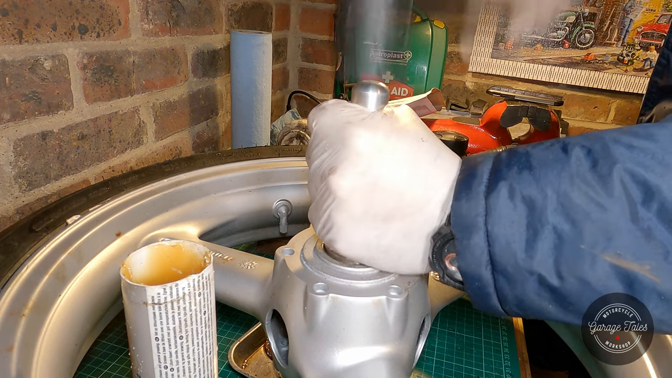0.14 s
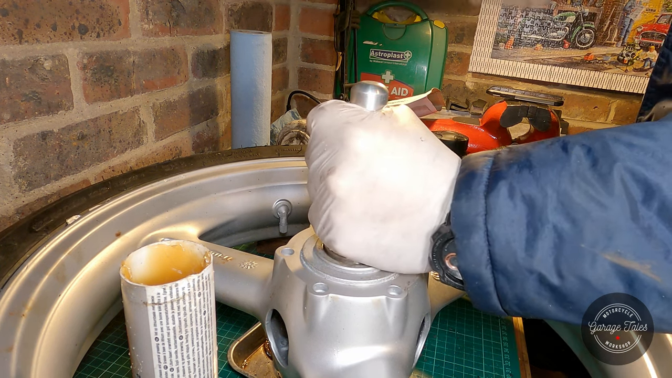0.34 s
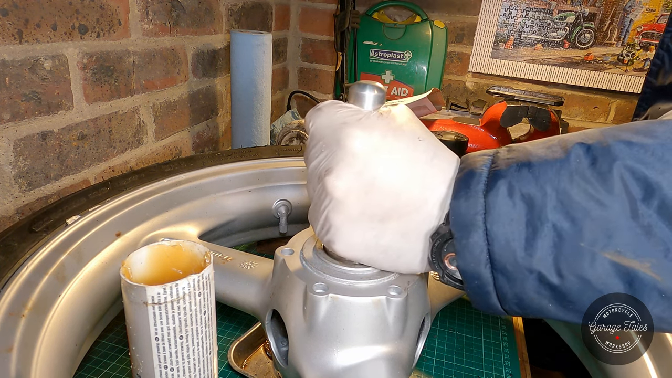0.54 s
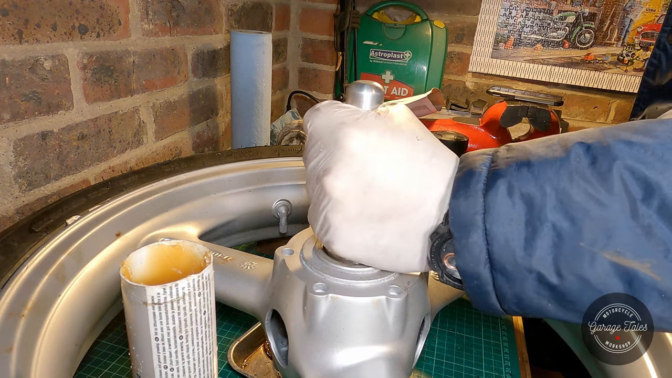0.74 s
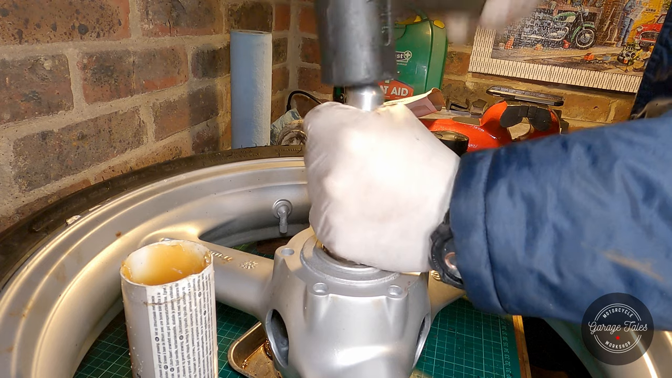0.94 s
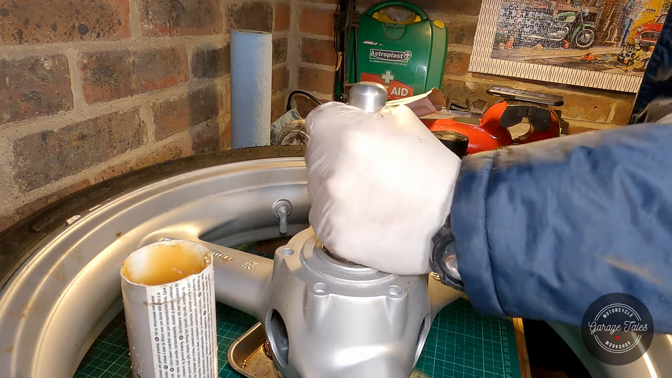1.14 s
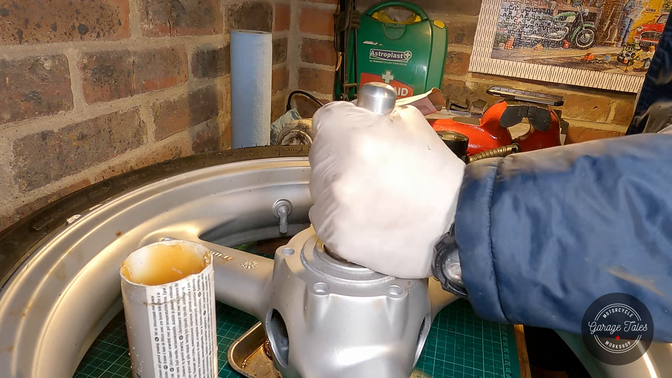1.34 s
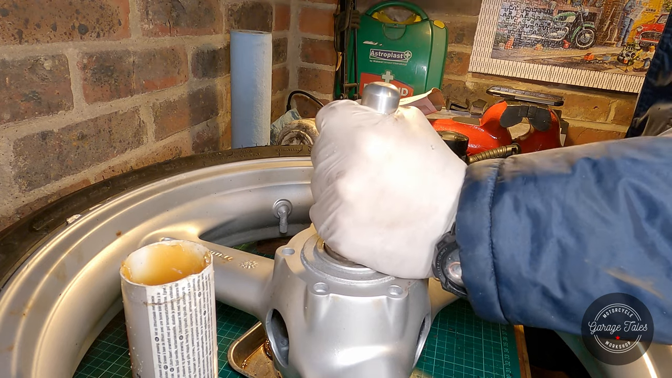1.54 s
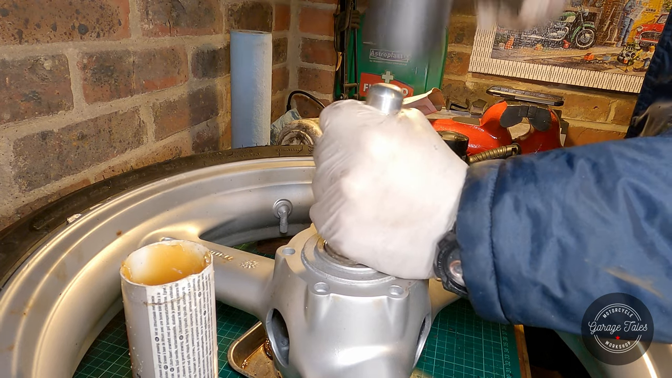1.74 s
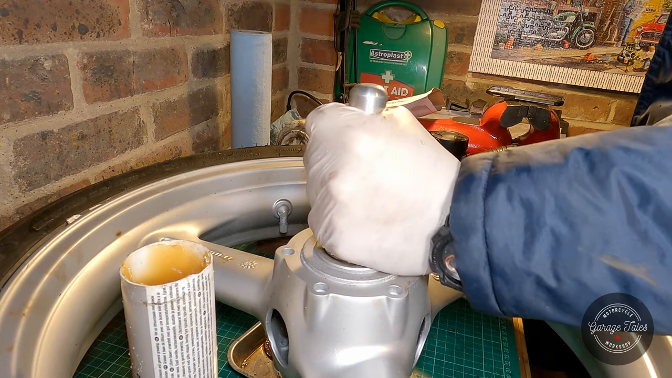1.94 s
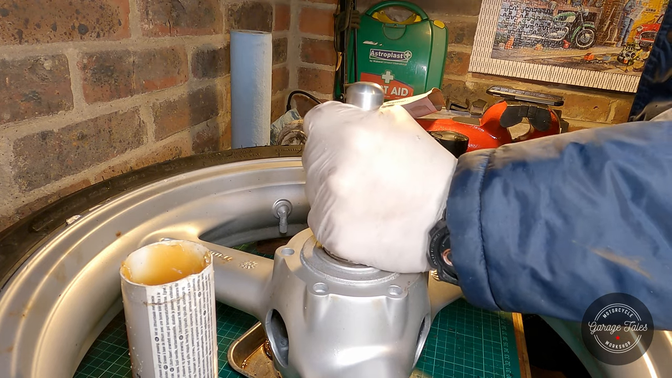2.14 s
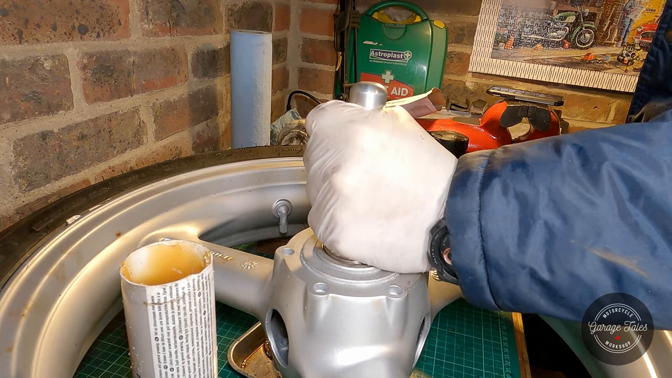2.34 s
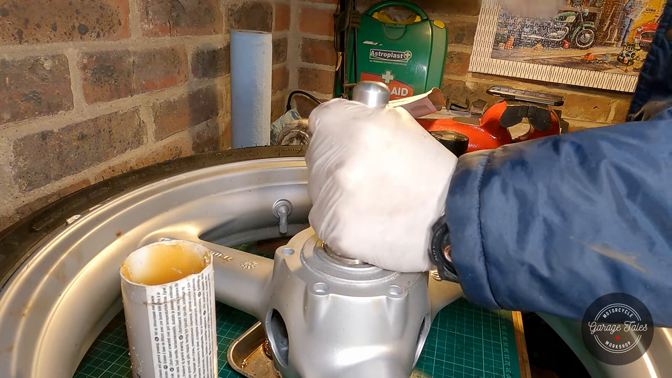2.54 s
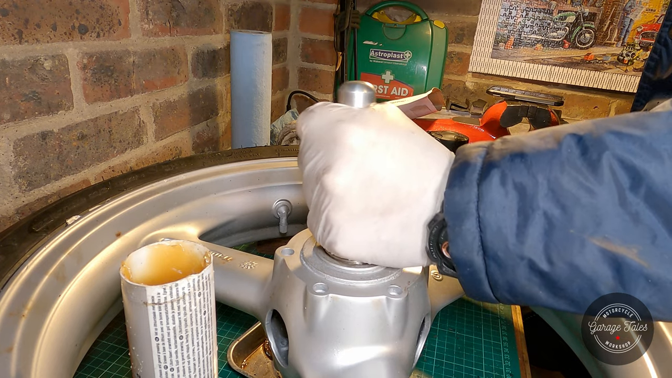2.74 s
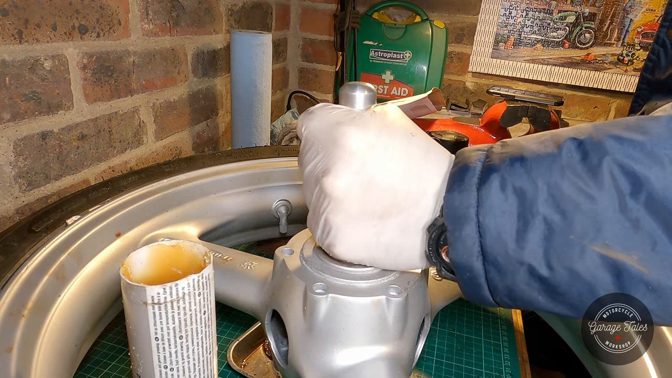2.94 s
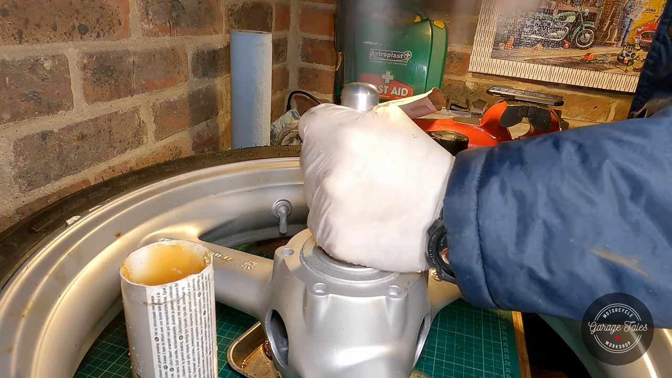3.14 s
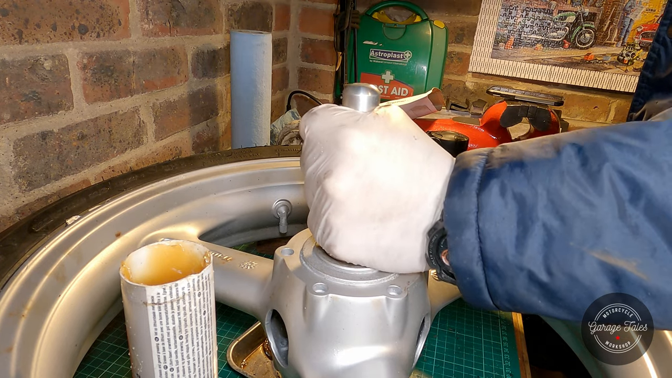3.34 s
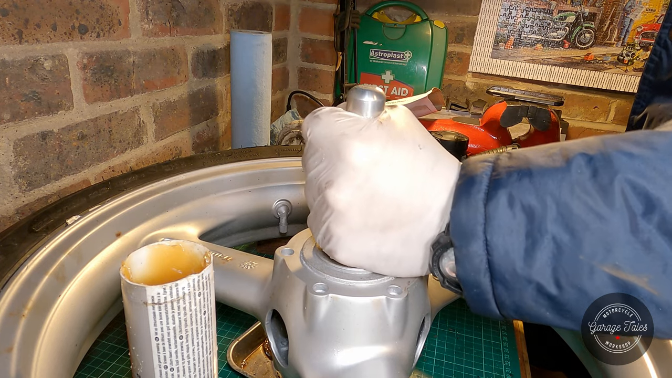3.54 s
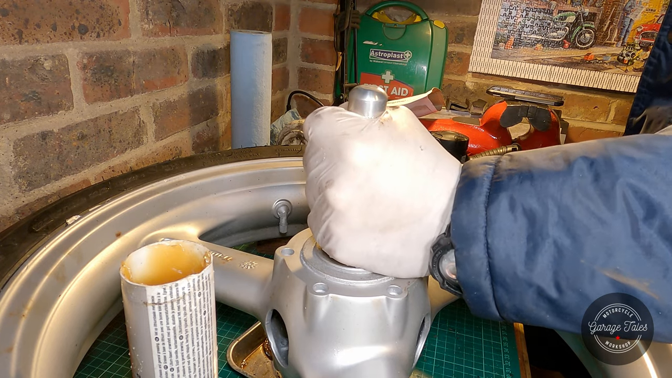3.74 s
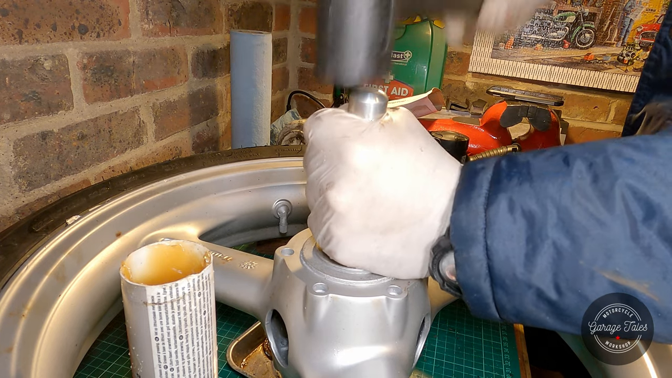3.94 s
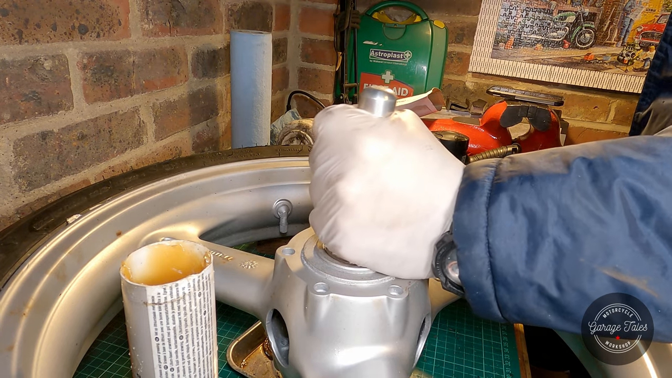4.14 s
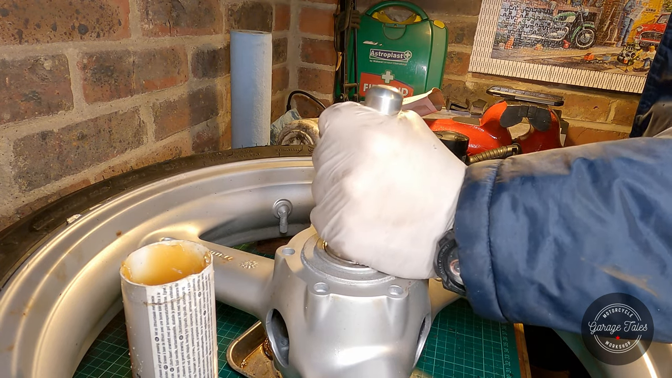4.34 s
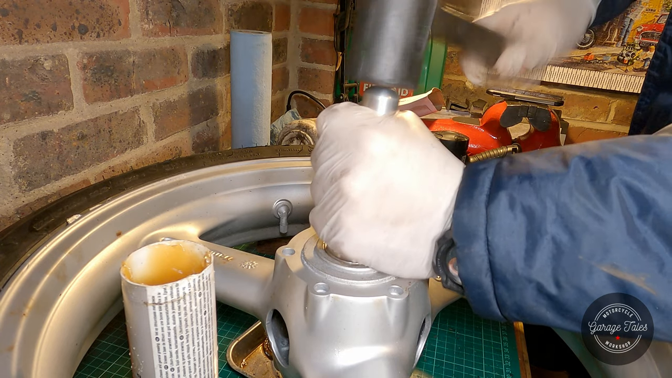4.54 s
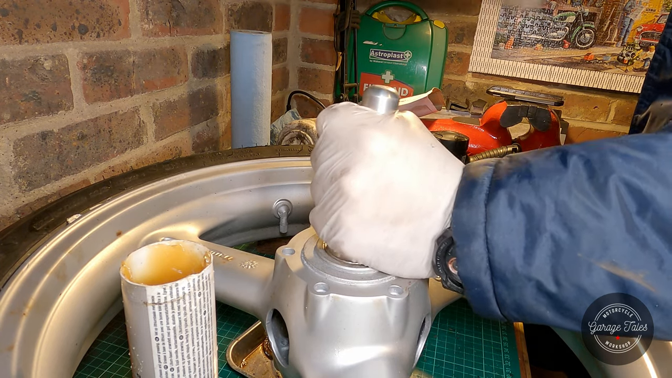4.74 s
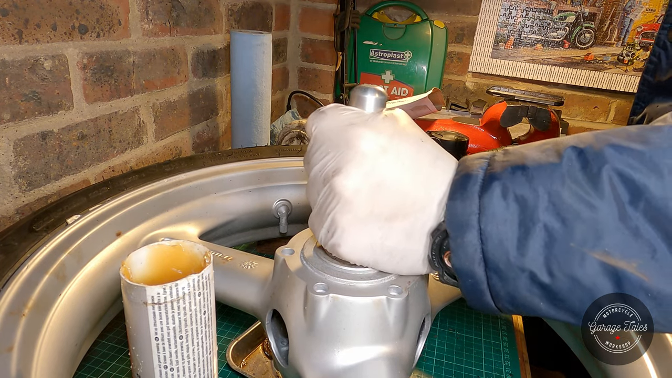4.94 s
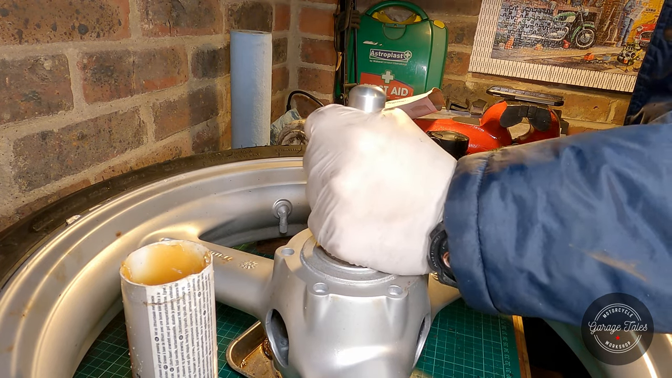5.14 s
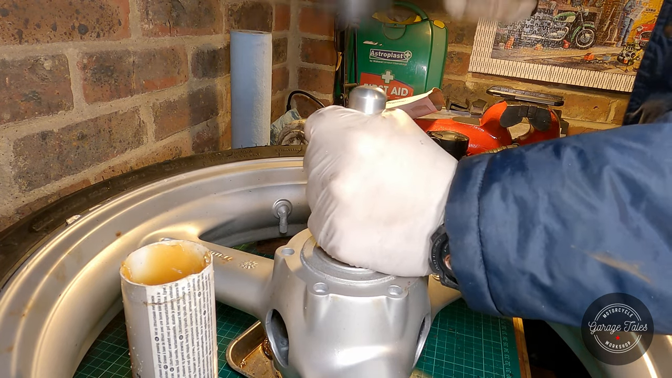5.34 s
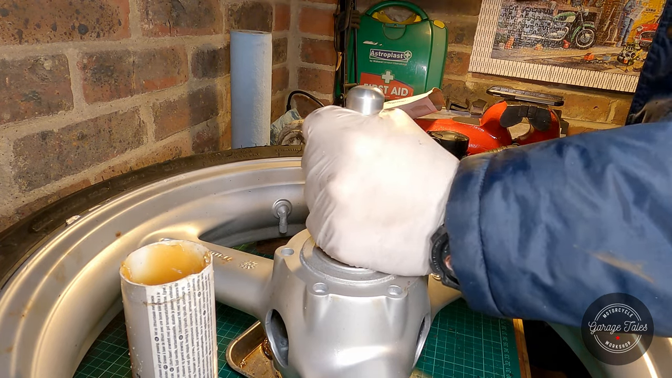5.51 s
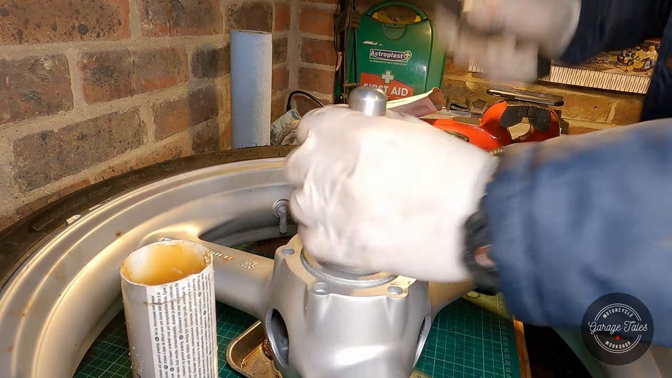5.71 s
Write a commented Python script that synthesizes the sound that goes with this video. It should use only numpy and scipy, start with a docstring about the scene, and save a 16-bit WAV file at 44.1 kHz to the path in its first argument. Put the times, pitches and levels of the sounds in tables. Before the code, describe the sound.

A steady series of eight mallet blows on metal, recorded close and nearly centred, the peaks slightly squashed and clipped. Each is a dry crack with a brief metallic clank, hollow middle knock and low thud fading into a short room tail. The clack brightens as the bearing seats. Sleeve rustle fills the gaps over very quiet room noise and faint hum; a weaker final hit is followed by rustle and small ringing ticks.

```python
"""In a small brick garage, a mallet drives a bearing into a wheel hub on a workbench: eight blows on a steel driver.
Each blow is a noise crack, short dying tones of hub, bearing, driver and wheel, a low bench thump and an echo.
The bearing's clack grows as it seats. Shaped noise makes the jacket sleeve's rustle and the driver's scrape and ticks.
Behind them lie room noise and a faint hum. At the end the loudest peaks are ducked a little late and clipped."""
import sys
import numpy as np
from scipy import signal
from scipy.fft import rfft, irfft, next_fast_len
from scipy.io import wavfile
from scipy.ndimage import map_coordinates

SR = 44100
rng = np.random.default_rng(int(sys.argv[2]) if len(sys.argv) > 2 else 0)


def unload_wav(signal):
    """Save mono or channel-first audio to the path in sys.argv[1] as 16-bit WAV at rate SR, clipped to [-1, 1]."""
    wavfile.write(
        sys.argv[1],
        SR,
        np.round(np.clip(np.atleast_2d(signal).T, -1, 1) * 32767).astype(np.int16),
    )


N = 258901  # length in samples


def amp(db):
    """Turn decibels into a gain."""
    return 10 ** (np.asarray(db) / 20)


def unit(x):
    """Scale x to an rms of 1."""
    return x / np.sqrt(np.mean(x ** 2) + 1e-20)


def along(points, hz):
    """Read a curve of (frequency, value) points on a log frequency axis."""
    f, v = np.transpose(points)
    return np.interp(np.log(hz + 1), np.log(f), v)


def filtered(x, response):
    """Multiply the spectrum of x by a response that depends on frequency."""
    n = x.shape[-1]
    padded = next_fast_len(n + SR // 4)
    spectrum = rfft(x, padded) * response(np.fft.rfftfreq(padded, 1 / SR))
    return irfft(spectrum, padded)[..., :n]


def noise(spectrum, n):
    """Make n samples of coloured noise at an rms of 1."""
    return unit(filtered(rng.standard_normal(n), lambda hz: amp(along(spectrum, hz))))


def wobble(rate):
    """Draw a smooth random curve through `rate` random points a second."""
    knots = rng.standard_normal(int(N * rate / SR) + 4)
    return map_coordinates(knots, [np.arange(N) * rate / SR])


def fade(t, t60):
    """Die away freely, falling 60 dB in t60 seconds."""
    return np.exp(-np.log(1000) * t / t60)


def swell(start_s, attack_s, hold_s, release_s):
    """Rise 60 dB up to start_s, hold, then fall 60 dB."""
    t = np.arange(N) / SR - start_s
    return fade(np.maximum(-t, 0), attack_s) * fade(np.maximum(t - hold_s, 0), release_s)


def add(track, s, sound):
    """Mix a sound into the track at time s."""
    start = max(round(s * SR), 0)
    track[start:start + len(sound)] += sound[:N - start]


def ring(modes, t):
    """Struck solid parts sound as a sum of dying sine tones, here with alternating signs."""
    out = 0
    for k, (hz, db, t60) in enumerate(modes):
        out = out + (-1) ** k * amp(db) * fade(t, t60) * np.sin(2 * np.pi * hz * t)
    return out


# colour of the room noise: (frequency [Hz], relative level [dB])
ROOM_SPECTRUM = [(25, -11), (55, -9.5), (80, -1), (110, -6), (160, 2.5), (300, -4), (550, -6), (1000, -9),
                 (3000, -15), (7000, -29.5), (9500, -41), (12000, -23), (14500, -58)]
# faint hum of the garage: (frequency [Hz], average level [dB])
HUM_TONES = [(155, -71), (203, -76)]


def background():
    """Quiet room noise, with faint hum tones that waver in level and phase."""
    t = np.arange(N) / SR
    hum = 0
    for hz, db in HUM_TONES:
        level = amp(db + 2 * wobble(5.5)) * np.sqrt(2)
        hum = hum + level * np.sin(2 * np.pi * hz * t + .8 * wobble(4.9))
    return hum + amp(-67) * noise(ROOM_SPECTRUM, N)


# colour of rubbing jacket cloth: (frequency [Hz], relative level [dB])
CLOTH_SPECTRUM = [(150, -26.5), (600, -3.5), (1700, 3.5), (3500, 2), (7000, -3.5), (9500, -23),
                  (12000, -3.5), (13500, -24.5), (15500, -55)]
# the arm lifts before a blow: (time ahead of the blow [s], attack [s], hold [s], release [s])
ARM_LIFT = (.5, .4, .08, 0.57)
# the arm swings down: (time ahead of the blow [s], attack [s], hold [s], release [s])
ARM_SWING = (0.072, 0.33, 0.027, 0.45)
# a fold of the sleeve snaps taut: (time ahead of the blow [s], attack [s], hold [s], release [s])
SLEEVE_FLICK = (.066, 0.049, 0.012, 0.036)
LIFT_DB, SWING_DB = -66.5, -55.5  # the swing also follows the force of the blow
# the hand slides off the driver at the end
LET_GO_S, LET_GO_DB, LET_GO_FADE_S = 5.85, -61, 0.97


def sleeve():
    """Rubbing cloth is noise that swells with each arm movement; its folds make it uneven."""
    rub = amp(LET_GO_DB) * swell(LET_GO_S, LET_GO_FADE_S, 0, LET_GO_FADE_S)
    for s, force_db, *_, flick_db in BLOWS:
        moves = [(LIFT_DB, ARM_LIFT), (SWING_DB + force_db, ARM_SWING), (flick_db, SLEEVE_FLICK)]
        for db, (ahead_s, *shape) in moves:
            # separate noises add by power
            rub = np.hypot(rub, amp(db) * swell(s - ahead_s, *shape))
    return rub * amp(0.88 * wobble(180)) * noise(CLOTH_SPECTRUM, N)


# colour of the driver scraping on its seat: (frequency [Hz], relative level [dB])
SCRAPE_SPECTRUM = [(500, -20), (2500, 0), (4800, -2), (7000, -8), (9500, -18), (12000, -8.5),
                   (13200, -16.5), (14000, -40)]
# the scrape peaks just after each blow
RATTLE_DELAY_S, RATTLE_DB, RATTLE_ATTACK_S, RATTLE_RELEASE_S = 0.036, -45.5, 0.12, 0.25


def rattle():
    """The driver jumps and rattles back onto its seat: a short, rough burst of scraping noise."""
    jolt = np.zeros(N)
    for s, force_db, *_ in BLOWS:
        shape = swell(s + RATTLE_DELAY_S, RATTLE_ATTACK_S, 0, RATTLE_RELEASE_S)
        jolt += amp(RATTLE_DB + force_db) * shape
    return jolt * amp(2.5 * wobble(300)) * noise(SCRAPE_SPECTRUM, N)


# tones of the steel driver: (frequency [Hz], relative level [dB], time to fall 60 dB [s])
DRIVER_TONES = [(2250, -28, .26), (3548, -52, .22), (4810, -50, .15), (6790, -55, .18)]


def driver_ring(t):
    """The steel driver rings with a few high tones."""
    return ring(DRIVER_TONES, t)


# the driver shifts on its seat: (time [s], level before the treble cut [dB], pitch [Hz])
DRIVER_TICKS = [(.033, -43.5, 1400), (.034, -52.5, 3110), (1.244, -46, 2860), (1.249, -47, 4030),
                (1.308, -49.5, 1065), (1.338, -49, 1170), (1.451, -40.5, 1062), (2.003, -54, 905),
                (3.532, -52.5, 901), (5.793, -47, 1200), (5.805, -49, 1440), (5.859, -44.5, 957)]
# once the fist has opened, a tick also rings the driver; its level is relative to the tick
GRIP_OPENS_S, PING_DB = 5.6, 12


def ticks():
    """Light contacts of driver and bearing: short noise around one pitch, with a faint longer tail."""
    out, t = np.zeros(N), np.arange(SR // 4) / SR
    for s, db, pitch_hz in DRIVER_TICKS:
        def band(hz):
            """Let through the frequencies around the pitch."""
            return 1 / (1 + 2.2j * (hz / pitch_hz - pitch_hz / (hz + 1))) ** 2

        contact = unit(filtered(rng.standard_normal(len(t)), band))
        tick = contact * (fade(t, .036) + amp(-20) * fade(t, .22))
        if s > GRIP_OPENS_S:
            tick = tick + amp(PING_DB) * driver_ring(t)
        add(out, s, amp(db) * tick)
    # all ticks are dull: their treble is cut
    return filtered(out, lambda hz: 1 / (1 + (hz / 5800) ** 6))


# colour of the echo: (frequency [Hz], relative level [dB])
ECHO_SPECTRUM = [(40, -26.5), (90, 8.5), (200, 19.5), (330, 14), (600, 7), (800, 0), (1500, -1),
                 (2600, -0.5), (4600, -3.5), (7000, -18), (9500, -20), (11600, -13), (13000, -20),
                 (14500, -46.5)]
# how long the garage echoes: (frequency [Hz], time to fall 60 dB [s])
ECHO_TIMES = [(80, 0.82), (200, 0.44), (500, 0.58), (1000, 0.5), (3000, .34), (6000, 0.37), (12000, 0.04)]


def garage(t, build_s):
    """The walls scatter a blow into a noise-like tail whose pitches die at their own speeds."""
    hz, when, z = signal.stft(noise(ECHO_SPECTRUM, len(t)), SR, nperseg=256)
    dying = z * fade(when, along(ECHO_TIMES, hz)[:, None])
    tail = signal.istft(dying, SR, nperseg=256)[1][:len(t)]
    return tail * (1 - np.exp(-t / build_s))


# tones of wheel, bench and garage air:
# (frequency [Hz], average relative level [dB], time to fall 60 dB [s], build-up [s])
BENCH_TONES = [(60.3, -32, 0.52, 0.061), (80, -22, 0.3, 0.029), (94.1, -32.5, 0.22, 0.012),
               (126.7, -27.5, 0.3, 0.027), (153.8, -24.5, 0.34, .01), (186, -21, 0.27, 0.053),
               (208.2, -29.5, 0.1, 0.019), (234, -27.5, 0.24, 0.00067), (267, -22, 0.073, .002),
               (310.4, -34.5, 0.49, 0.012), (341.5, -20, .1, 0.00042), (415, -47.5, 0.13, .003),
               (588.4, -32, .25, .003)]


def thump(t):
    """The push passes through the wheel into the bench, whose low tones take a moment to build."""
    out = 0
    for k, (hz, db, t60, rise_s) in enumerate(BENCH_TONES):
        envelope = amp(db + rng.normal(0, .7)) * fade(t, t60) * (1 - np.exp(-t / rise_s))
        out = out + (-1) ** k * envelope * np.sin(2 * np.pi * hz * t)
    return out


# the wheel's hollow knock: (frequency [Hz], relative level [dB], time to fall 60 dB [s])
KNOCK_TONES = [(443.6, -10.5, 0.031), (581.5, -4.5, 0.021), (616, -12, 0.073), (645, -11, 0.019)]


def wheel_knock(t):
    """The wheel answers with short, hollow middle tones."""
    return ring(KNOCK_TONES, t)


# the bearing race: (frequency [Hz], relative level [dB], time to fall 60 dB [s])
RACE_TONES = [(4235, -1, 0.0085), (5070, -9, 0.007)]


def bearing_clack(t):
    """The bearing race gives two very short, high tones."""
    return ring(RACE_TONES, t)


# the hub: (average frequency [Hz], average relative level [dB], time to fall 60 dB [s])
HUB_TONES = [(765, -17, .018), (985, -29.5, 0.081), (2405, -9, 0.0054), (2780, -21, 0.0099),
             (3320, -19, 0.0068), (11400, -35.5, 0.017)]


def hub_ring(t):
    """The quickly damped hub answers a little differently wherever the push meets it."""
    varied = [(hz * (1 + rng.normal(0, 0.03)), db + rng.normal(0, 1.2), t60) for hz, db, t60 in HUB_TONES]
    return ring(varied, t)


# colour of the contact noise: (frequency [Hz], relative level [dB])
CRACK_SPECTRUM = [(60, -26), (200, -10), (600, 13), (1500, 6.5), (3200, -0.5), (4900, -1), (7000, -14),
                  (9500, -28), (11500, -25), (16000, -38)]


def contact_crack(t):
    """The mallet's face gives for a fraction of a millisecond, then the contact noise dies quickly."""
    return amp(-5.5) * noise(CRACK_SPECTRUM, len(t)) * (1 - np.exp(-t / 0.00046)) * fade(t, 0.012)


# the blows; how the driver sits changes the hub's voice:
# (time [s], force [dB], driver's freedom to ring [dB], clank pitch [Hz], clank level before force [dB],
#  sleeve flick level [dB])
BLOWS = [(0.2887, -0.5, -6.5, 1222, -6, -51.5), (1.0188, 0, 2.5, 1431, -7.5, -59),
         (1.7728, -0.5, -1.5, 1493, -8, -46.5), (2.532, 0, -5, 1519, -8.5, -46.5),
         (3.2958, -1.5, -3.5, 1047, -8, -46), (4.01, 0, -3, 1708, -7.5, -49.5),
         (4.678, -2, 6, 1274, -7.5, -53.5), (5.3466, -5, 6, 1195, 1, -65)]
# the blows harden as the bearing goes home: gains on the first and last blow, before force
CRACK_FIRST_DB, CRACK_LAST_DB = 7.5, 8.5
CLACK_FIRST_DB, CLACK_LAST_DB = -9, 3
# gains at 0 dB of freedom; a freely held driver also passes more knock to the wheel
RING_DB, KNOCK_DB = -1, 0.77
KNOCK_FOLLOWS = .35  # dB of knock per dB of freedom


def hammer():
    """Each blow excites crack, hub, clank, bearing, driver, wheel, bench and echo at once."""
    out, t = np.zeros(N), np.arange(SR) / SR
    for seated, blow in zip(np.linspace(0, 1, len(BLOWS)), BLOWS):
        s, force_db, free_db, clank_hz, clank_db, _ = blow
        crack_db = np.interp(seated, [0, 1], [CRACK_FIRST_DB, CRACK_LAST_DB])
        clack_db = np.interp(seated, [0, 1], [CLACK_FIRST_DB, CLACK_LAST_DB])
        strike = amp(crack_db) * (contact_crack(t) + hub_ring(t))
        clank = ring([(clank_hz, clank_db, .025)], t)
        clack = amp(clack_db) * bearing_clack(t)
        ringing = amp(RING_DB + free_db) * driver_ring(t)
        knock = amp(KNOCK_DB + KNOCK_FOLLOWS * free_db) * wheel_knock(t)
        body = thump(t) + amp(-27.0) * garage(t, build_s=0.0016)
        add(out, s, amp(force_db) * (strike + clank + clack + ringing + knock + body))
    return out


# difference between the two microphone ports: (frequency [Hz], relative level [dB])
PORT_DIFFERENCE = [(3000, -50), (5000, -34.5), (8000, -18), (11500, -10.5), (15000, -3.5)]


def scene():
    """All sources sit straight ahead; the two ports differ mainly in the shortest waves."""
    mono = background() + sleeve() + rattle() + ticks() + hammer()
    # the difference is turned by 1.85 radians
    side = filtered(mono, lambda hz: amp(along(PORT_DIFFERENCE, hz)) * np.exp(1.85j))
    return np.array([mono + side, mono - side])


# narrow peaks and dips of the microphone's tone: (centre [Hz], half width [Hz], gain [dB])
TONE_PEAKS = [(352, 22, -8), (418, 22, 8), (466, 20, -11), (520, 30, 6), (765, 24, -9), (880, 26, 4),
              (935, 20, -8), (1135, 24, -4), (1400, 35, -4)]


def tone(hz):
    """Narrow peaks and dips plus a fine treble ripple; without phase shift it rings before and after."""
    knot_hz, ripple_db = 45, .6
    ripple = map_coordinates(rng.standard_normal(SR // knot_hz), [hz / knot_hz])
    peaks = sum(db / (1 + ((hz - centre) / width) ** 2) for centre, width, db in TONE_PEAKS)
    treble = (hz > 1000) * (hz < 9000)
    return amp(peaks + ripple_db * ripple * treble)


def limiter(x, top_db, attack_s, recovery_db_per_s):
    """The gain ducks just after a peak and climbs back, so that the echo swells."""
    climb = recovery_db_per_s * np.arange(N) / SR
    excess_db = 20 * np.log10(np.maximum(np.abs(x).max(axis=0) / amp(top_db), 1))
    # remember the largest excess, less what has been recovered since
    duck_db = np.maximum.accumulate(excess_db + climb) - climb
    pole = np.exp(-1 / (attack_s * SR))
    return x * amp(-signal.lfilter([1 - pole], [1, -pole], duck_db))


def record(dry):
    """Cut the bass, colour the tone, duck the peaks slightly late, clip them and cut the top."""
    bass_cut = signal.butter(N=3, Wn=46, btype="high", fs=SR, output="sos")
    lean = signal.sosfilt(bass_cut, dry)
    held = limiter(filtered(lean, tone), top_db=1, attack_s=.0003, recovery_db_per_s=210)
    ceiling, hardness = .55, 6
    clipped = held / (1 + np.abs(held / ceiling) ** hardness) ** (1 / hardness)
    top_hz = 16500  # nothing passes from here up
    return filtered(clipped, lambda hz: (hz < top_hz) / (1 + (hz / 14500) ** 14))


dry = scene()
out = record(dry)
unload_wav(out)
```